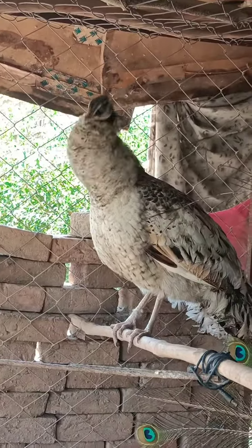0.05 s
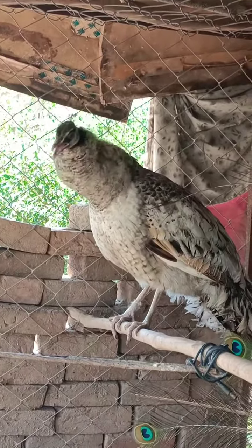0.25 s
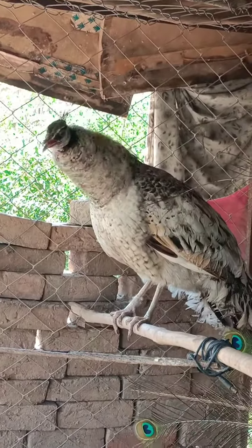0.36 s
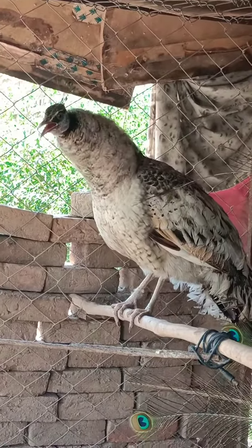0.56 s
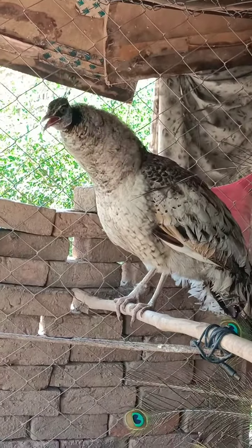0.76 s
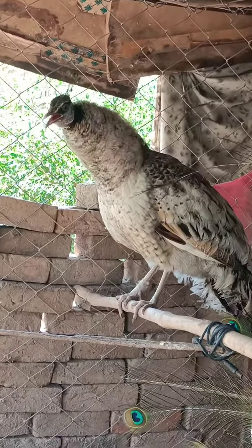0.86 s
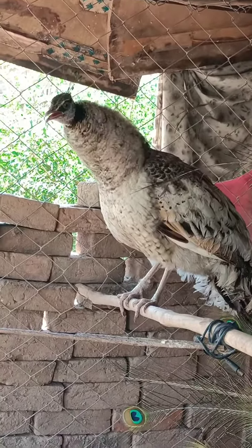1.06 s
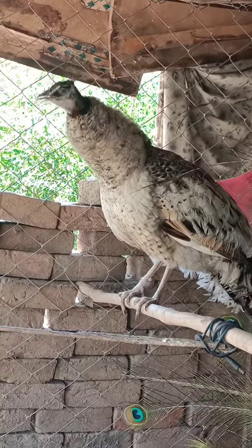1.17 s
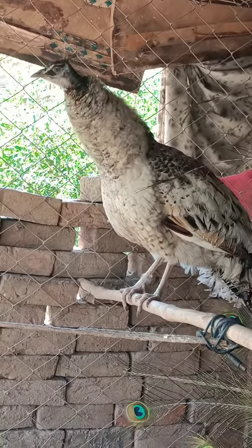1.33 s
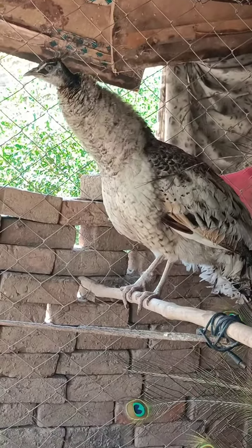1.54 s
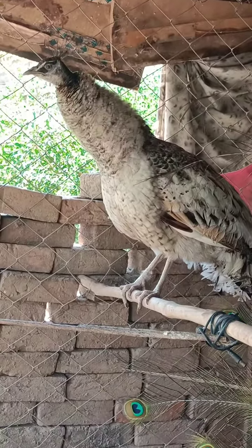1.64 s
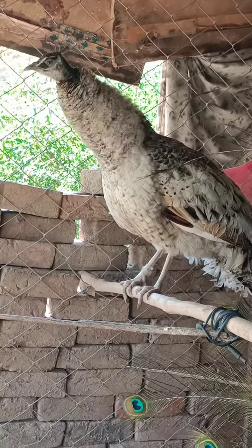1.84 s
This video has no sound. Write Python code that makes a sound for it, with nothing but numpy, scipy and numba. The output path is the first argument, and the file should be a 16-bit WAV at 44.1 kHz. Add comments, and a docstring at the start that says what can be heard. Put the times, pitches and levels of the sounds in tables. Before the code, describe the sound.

A peafowl gives one loud, harsh honk that breaks upward into a ringing wail.

```python
"""A steady outdoor rumble and hiss surround a brick backyard pen. At 0.2 s a peafowl, close by and nearer
the right microphone, gives a harsh low honk: uneven pulses excite the resonances of its throat and beak.
The honk breaks upward into a ringing wail that starts with every second pulse weak, clears at its peak,
then sags and frays into a rattle. The pen answers with faint reflections.
Just before the end a thin note sounds far away, perhaps from another bird."""
import sys
import numpy as np
from scipy import signal
from scipy.fft import rfft, irfft
from scipy.io import wavfile
from numba import njit

SR = 44100
rng = np.random.default_rng(int(sys.argv[2]) if len(sys.argv) > 2 else 0)


def transcribe(u):
    """Save the signal u as a 16-bit wav file named by the first command-line argument.

    u: samples, shape (n,) or (channels, n), limited to [-1, 1]; the rate is SR.
    q: integer samples, one column per channel.
    """
    v = np.clip(np.atleast_2d(u).T, -1, 1)
    q = np.round(v * 32767).astype(np.int16)
    wavfile.write(sys.argv[1], SR, q)


N = 83790

# Spectra of the outdoor noise. Each row: frequency in Hz, relative spectral density in dB.
RUMBLE_SPECTRUM = [(15, -36.5), (28, -3), (44, -8), (62, -3.5), (90, -5), (125, 1), (160, 0), (185, -8.5),
                   (240, -7.5), (360, -18), (560, -18.5), (900, -28.5), (2000, -33.5), (5000, -72)]
LEFT_HISS_SPECTRUM = [(60, 14), (500, 4.5), (1000, 3), (1700, 1.5), (3000, -17), (4300, -21.5), (6000, -41),
                      (8500, -50), (10000, -21), (12500, -30), (15500, -47)]
RIGHT_HISS_SPECTRUM = [(60, 11), (500, -12.5), (1000, -0.5), (1700, 1.5), (3000, -2.5), (4300, -12.5),
                       (6000, -21), (7300, -26), (8500, -31), (10000, -34), (12500, -34), (15500, -49.5)]
# The rumble swells and eases. Each row: time in seconds, gain in dB.
RUMBLE_ENVELOPE = [(0, 4), (.13, 2), (.25, -0.5), (1., 1.5), (1.3, -0.5), (1.9, 0.5)]
RUMBLE_DB, RUMBLE_SIDE_DB, HISS_LEFT_DB, HISS_RIGHT_DB = -36.5, -19.5, -48, -42.5

# Pulse rate of the honk. Each row: time in seconds, pitch in Hz.
HONK_CONTOUR = [(.205, 184.2), (.228, 202.1), (.25, 208.7), (.272, 223.5), (.311, 231.4), (.335, 227.7),
                (.375, 215)]
# Irregularity of its pulses. Each row: time in seconds, roughness from 0 to 1.
HONK_ROUGHNESS = [(.205, .7), (.23, .85), (.262, 1), (.285, .5), (.302, .08), (.332, .08), (.345, .28),
                  (.364, .2), (.38, .7)]
# Balance of the honk. Each row: time in seconds, then bass, middle and treble gains in dB.
HONK_BAND_GAINS = [(.206, -9.5, -5.5, -18.5), (.22, -2.5, 1, -8), (.262, -3.5, 2.5, -4),
                   (.28, -1, -1.5, -3.5), (.315, -5, -5, 1), (.345, -4.5, -10, -2.5), (.364, -2, -2, -3),
                   (.372, -19.5, -2, -19.5), (.39, -9, 1.5, -13.5)]
# Resonances of the throat and beak. Each row: centre in Hz, width in Hz, gain in dB.
BASS_FORMANTS = [(242, 102, -18), (662, 270, -24), (886, 69, -40.5)]
MIDDLE_FORMANTS = [(1113, 303, -17.5), (1371, 73, -11.5), (1544, 220, -15.5), (2058, 140, -23)]
TREBLE_FORMANTS = [(3480, 460, -14), (4510, 500, -16), (5600, 700, -26.5), (6800, 1100, -31.5),
                   (13100, 2500, -59)]
BEAK_FORMANT = [(3066, 337, -10.5)]
SMOOTH_VOICE_FORMANTS = [(2013, 210, -19), (5470, 380, -28.5)]
HONK_START_S, HONK_END_S = .205, .396
HONK_JITTER_CYCLES, HONK_SHIMMER, HONK_NOISE = .05, .22, .45  # at full roughness
HONK_SMEAR_CYCLES = .65  # the treble of each pulse is spread over this share of a cycle
BEAK_CLOSES_S, BEAK_SLIDE_PER_S, BEAK_LOWEST_RATIO = .334, 10.7, .82

# Rough bricks scatter mostly treble. Each row: frequency in Hz, gain in dB.
BRICK_SCATTER = [(200, -18), (1600, -18), (3000, -6), (5000, 0)]
HONK_WALL_DB, WAIL_WALL_DB, WALL_T60_S = -6, -14, .06
PEN_DB, PEN_T60_S = -23, .6

# Fundamental of the wail. Each row: time in seconds, pitch in Hz.
WAIL_CONTOUR = [(.368, 517), (.39, 523.1), (.42, 520.7), (.45, 537.9), (.482, 537.9), (.52, 533.3),
                (.56, 529.7), (.61, 509.5), (.655, 493.2), (.72, 491.4)]
# Balance of the wail. Each row: time in seconds, levels of harmonics 1, 2, 3 in dB, overtone gain in dB.
WAIL_HARMONIC_LEVELS = [(.37, -20, -20.5, -32, -29), (.385, -23, -10.5, -32.5, -5.5),
                        (.415, -25, -9.5, -22.5, -9), (.445, -22, -10.5, -11, -0.5),
                        (.484, -22.5, -17, -7.5, 0.5), (.515, -24, -12.5, -10.5, -2.5),
                        (.555, -23.5, -11, -14, -2), (.585, -25.5, -15, -21.5, -10.5),
                        (.635, -31.5, -15.5, -21, -18.5), (.68, -35.5, -27, -24, -44),
                        (.715, -36, -28, -28.5, -50)]
# Breaking of the voice. Each row: time in seconds, subharmonic gain in dB, roughness from 0 to 1.
WAIL_BREAKUP = [(.37, -16.5, 0.8), (.393, 2.5, .18), (.435, 0, 0), (.462, -15, .04), (.555, -35, 0.12),
                (.585, 0, 0.5), (.64, -14, 0.6), (.685, -14.5, 0.93), (.72, -39, 0.3)]
# Spectral envelopes of the wail. Each row: frequency in Hz, relative level in dB.
OVERTONE_SPECTRUM = [(2130, -24.5), (2680, -34.5), (3220, -28.5), (3760, -24), (4300, -27), (4830, -39.5),
                     (5370, -37.5), (6450, -41), (7000, -42.5), (7600, -65), (8600, -52.5), (11000, -73),
                     (14000, -66)]
SUBHARMONIC_SPECTRUM = [(262, -34), (786, -31.5), (1310, -16), (1830, -38), (2400, -43), (2900, -53.5),
                        (3400, -35), (3900, -63.5), (4500, -47.5), (7000, -44), (8500, -78.5)]
# Resonances excited by turbulence in the throat. Each row: centre in Hz, width in Hz, gain in dB.
RASP_FORMANTS = [(1350, 330, -14.5), (1423, 200, -18), (3550, 580, -35), (5800, 1200, -72.5)]
WAIL_START_S, WAIL_END_S, RASP_FADE_DB_PER_S = .362, .724, 17.5
WAIL_JITTER_CYCLES, WAIL_FLUTTER, RATTLE_DB = .006, .76, 2.4  # at full roughness
FLUTTER_HZ, RATTLE_HZ, WAVER_HZ = 90, 110, 50
WAVER_DB, WAVER_GROWS_S, LOW_WAVER_SHARE = 3.5, .48, .4  # past the peak each harmonic wavers more
OVERTONE_SOFTEN_DB = 3.5  # the wail loses its edge as it frays

# Partials of the far-off call. Each row: frequency in Hz, level in dB.
FAR_PARTIALS = [(1290, -49.5), (1720, -47.5), (2580, -49.5), (3010, -53)]
FAR_START_S, FAR_END_S, FAR_FADE_S = 1.775, 2.0, .05

# Acoustic shade at the left microphone. Each row: frequency in Hz, gain against the right in dB.
LEFT_GAIN = [(100, -30.5), (230, 4.5), (530, 5), (690, 7.5), (820, -17), (1050, -11.5), (1330, -6.5),
             (1600, -5.5), (2050, -10.5), (2600, -15), (3100, -28), (3800, -18.5), (4500, -25),
             (7000, -28.5), (12000, -2)]
# Phase at the left microphone. Each row: frequency in Hz, lead over the right in radians.
LEFT_LEAD = [(0, 0), (300, 0), (550, -.3), (780, -.6), (1030, 1.4), (1290, -1.2), (1600, -.3), (2150, .8),
             (3100, -.8), (3800, -3.9)]
# Treble dip of both microphones. Each row: frequency in Hz, gain in dB.
MIC_RESPONSE = [(7500, 0), (8400, -6), (9200, -21), (10500, -26), (12000, -3), (14000, -5), (15500, -11)]
PEAK_LIMIT, TOP_HZ = .92, 15500


def undb(db):
    """Amplitude grows tenfold for every 20 dB."""
    return 10 ** (np.asarray(db) / 20)


def times():
    """Uniform sampling instants, in seconds."""
    return np.arange(N) / SR


def curves(table):
    """Linear interpolation in time, one curve for each column after the first."""
    rows = np.array(table, float)
    return [np.interp(times(), rows[:, 0], col) for col in rows[:, 1:].T]


def gain_at(hz, points):
    """Gain of a (Hz, dB) spectrum, interpolated over log frequency."""
    f, db = np.array(points, float).T
    return undb(np.interp(np.log(np.maximum(hz, 1)), np.log(f), db))


def colour(x, points, lead=0):
    """Filtering multiplies the spectrum by a (Hz, dB) gain and a (Hz, radians) phase lead."""
    f = np.arange(N + 1) * SR / (2 * N)
    turn = np.interp(f, *np.array(lead).T) if lead else 0
    return irfft(rfft(x, 2 * N) * gain_at(f, points) * np.exp(1j * turn))[..., :N]


def noise(points, db):
    """Filtered white noise, scaled to an RMS level."""
    x = colour(rng.standard_normal(N), points)
    return x / x.std() * undb(db)


def wander(hz):
    """Random modulation: noise of unit deviation, low-passed at hz."""
    rolloff = np.sqrt(1 + (np.fft.rfftfreq(N, 1 / SR) / hz) ** 8)
    x = irfft(rfft(rng.standard_normal(N)) / rolloff, N)
    return x / x.std()


def gate(start, end, attack_s, release_s):
    """A trapezoidal envelope: attack, hold, release."""
    return np.clip((times() - start) / attack_s, 0, 1) * np.clip((end - times()) / release_s, 0, 1)


@njit
def resonator(x, hz, width):
    """A second-order resonance with a moving centre and unit gain there."""
    y, band, low = np.empty(len(x)), 0., 0.
    for i in range(len(x)):
        g, damping = np.tan(np.pi * hz[i] / SR), width / hz[i]
        v = (band + g * (x[i] + 1e-18 - low)) / (1 + g * (g + damping))
        band, low, y[i] = 2 * v - band, low + 2 * g * v, damping * v
    return y


def ring(x, formants, slide=1):
    """Formants add in parallel, each two resonators in cascade; slide scales their centres."""
    scale = slide * np.ones(N)
    return sum(undb(db) * resonator(resonator(x, hz * scale, float(width)), hz * scale, float(width))
               for hz, width, db in formants)


def outdoors():
    """Distant rumble is nearly coherent at the two microphones; their hiss is uncorrelated."""
    swell_db = curves(RUMBLE_ENVELOPE)[0] + .69 * wander(4.3)
    rumble = noise(RUMBLE_SPECTRUM, RUMBLE_DB) * undb(swell_db)
    side = noise(RUMBLE_SPECTRUM, RUMBLE_DB + RUMBLE_SIDE_DB)
    return np.array([rumble + side + noise(LEFT_HISS_SPECTRUM, HISS_LEFT_DB),
                     rumble - side + noise(RIGHT_HISS_SPECTRUM, HISS_RIGHT_DB)])


def puffs(cycles, hz, decay_cycles):
    """Turbulent noise modulated once a cycle, about as strong as a train of unit harmonics."""
    opening = np.exp(-(cycles % 1) / decay_cycles)
    return rng.standard_normal(N) * opening / np.sqrt(np.mean(opening ** 2)) * np.sqrt(SR / hz / 4)


def honk():
    """Source and filter: uneven low pulses and puffs of air excite the throat and beak resonances."""
    (hz,), (rough,) = curves(HONK_CONTOUR), curves(HONK_ROUGHNESS)
    bass_db, middle_db, treble_db = curves(HONK_BAND_GAINS)
    cycles = np.cumsum(hz * (times() > HONK_START_S)) / SR - .15
    cycles += HONK_JITTER_CYCLES * rough * wander(173.6)
    lags = np.cumsum(HONK_SMEAR_CYCLES * rng.random(63) * np.minimum(np.arange(63) / 12, 1))
    pulses = sum(np.cos(2 * np.pi * (k * cycles - lag)) for k, lag in enumerate(lags, 1))
    pulses *= 1 + HONK_SHIMMER * rough * wander(80)
    air = HONK_NOISE * rough * puffs(cycles, hz, decay_cycles=.22)
    envelope = gate(HONK_START_S, HONK_END_S, attack_s=.00093, release_s=.018)
    source = envelope * (pulses + air)
    bass = ring(envelope * (pulses + .13 * air), BASS_FORMANTS)
    middle = ring(source, MIDDLE_FORMANTS)
    # The closing beak lowers its resonance.
    slide = np.clip(1 - BEAK_SLIDE_PER_S * (times() - BEAK_CLOSES_S), BEAK_LOWEST_RATIO, 1)
    treble = ring(source, BEAK_FORMANT, slide) + ring(source, TREBLE_FORMANTS)
    treble += ring(source * (1 - rough) ** 2, SMOOTH_VOICE_FORMANTS)
    return undb(bass_db) * bass + undb(middle_db) * middle + undb(treble_db) * treble


def echoes(x, t60, db):
    """Diffuse reflections arrive after 3 ms and decay exponentially, by 60 dB in t60 seconds."""
    tail = rng.standard_normal(N) * np.exp(-np.log(1000) * times() / t60) * (times() > .003)
    return undb(db) * signal.fftconvolve(x, tail / np.linalg.norm(tail))[:N]


def pen(x, wall_db):
    """Superposition of direct sound, quick scatter from bricks and roof, and faint reverberation."""
    return x + echoes(colour(x, BRICK_SCATTER), WALL_T60_S, wall_db) + echoes(x, PEN_T60_S, PEN_DB)


def wail():
    """Period doubling puts subharmonics between a high voice's harmonics; random modulation frays it."""
    (hz,), (subharmonic_db, rough) = curves(WAIL_CONTOUR), curves(WAIL_BREAKUP)
    *low_levels_db, overtone_db = curves(WAIL_HARMONIC_LEVELS)
    cycles = np.cumsum(hz * (1 + .003 * wander(35))) / SR
    cycles += WAIL_JITTER_CYCLES * rough * wander(300)
    waver_db = WAVER_DB * np.clip((times() - WAVER_GROWS_S) / .013, .3, 1)

    def partial(k):
        """Amplitude modulation of multiple k of the pitch; the lowest flutter least."""
        flutter = WAIL_FLUTTER * rough * min(k / 3, 1) ** 2 * wander(FLUTTER_HZ)
        return np.cos(2 * np.pi * (k * cycles + rng.random())) * (1 + flutter)

    low_harmonics = sum(undb(db + LOW_WAVER_SHARE * waver_db * wander(WAVER_HZ)) * partial(k)
                        for k, db in enumerate(low_levels_db, 1))
    overtones = sum(gain_at(k * hz, OVERTONE_SPECTRUM) * undb(waver_db * wander(WAVER_HZ)) * partial(k)
                    for k in range(4, 29))
    overtones *= undb(overtone_db - OVERTONE_SOFTEN_DB * rough)
    subharmonics = sum(gain_at(k * hz, SUBHARMONIC_SPECTRUM) * partial(k) for k in np.arange(16) + .5)
    rasp_fade = undb(-RASP_FADE_DB_PER_S * (times() - WAIL_START_S))
    rasp = rough * rasp_fade * ring(puffs(cycles, hz, decay_cycles=.6), RASP_FORMANTS)
    envelope = gate(WAIL_START_S, WAIL_END_S, attack_s=.012, release_s=.014)
    rattle = undb(RATTLE_DB * rough * wander(RATTLE_HZ))
    return envelope * rattle * (low_harmonics + overtones + undb(subharmonic_db) * subharmonics + rasp)


def far_call():
    """Shared frequency modulation makes four faint partials one thin, unsteady note."""
    clock = np.cumsum(1 + .00366 * wander(30.3)) / SR
    note = sum(undb(db) * np.sin(2 * np.pi * hz * clock) for hz, db in FAR_PARTIALS)
    return note * gate(FAR_START_S, FAR_END_S, FAR_FADE_S, FAR_FADE_S)


def scene():
    """The bird faces the right microphone, the left lies in acoustic shade; each has its own echoes."""
    low, high, far = honk(), wail(), far_call()
    left, right = (pen(low, HONK_WALL_DB) + pen(high, WAIL_WALL_DB) + far for _ in range(2))
    return np.array([colour(left, LEFT_GAIN, LEFT_LEAD), right]) + outdoors()


def record(dry):
    """Soft saturation rounds the peaks; filters dull the treble around 10 kHz and cut the top."""
    rounded = dry / (1 + (dry / PEAK_LIMIT) ** 8) ** (1 / 8)
    lowpass = signal.ellip(8, .2, 70, TOP_HZ, fs=SR, output="sos")
    return signal.sosfilt(lowpass, colour(rounded, MIC_RESPONSE))


dry = scene()
out = record(dry)
transcribe(out)
```